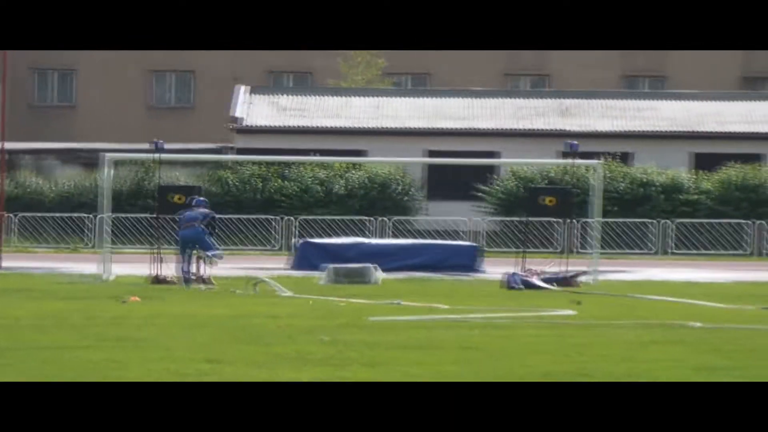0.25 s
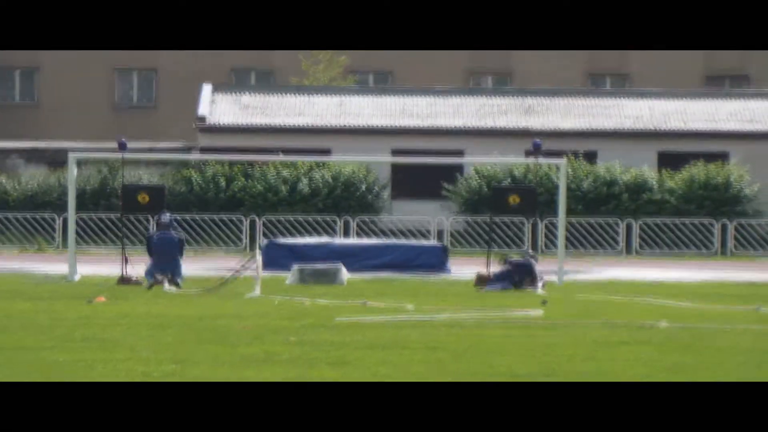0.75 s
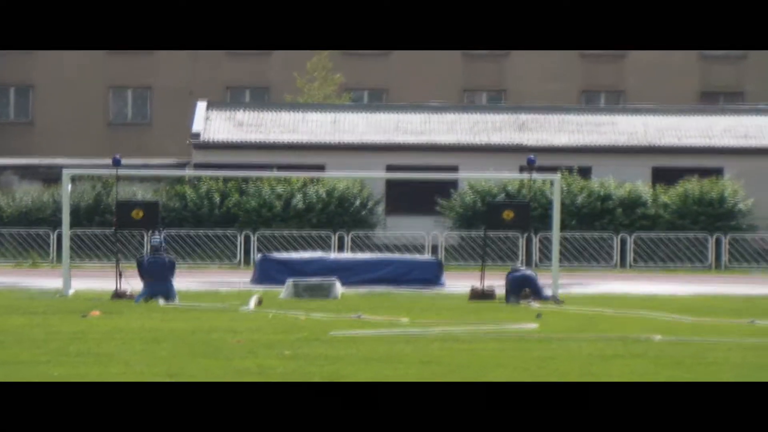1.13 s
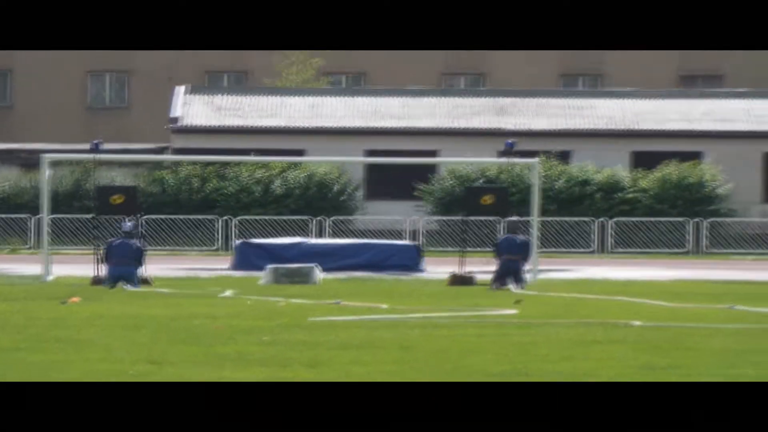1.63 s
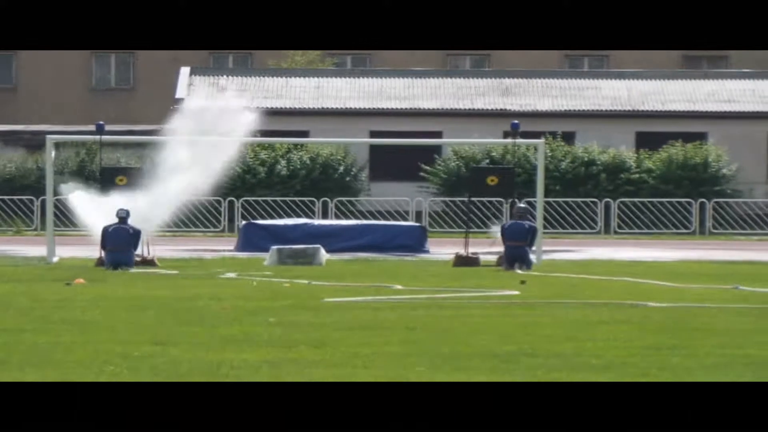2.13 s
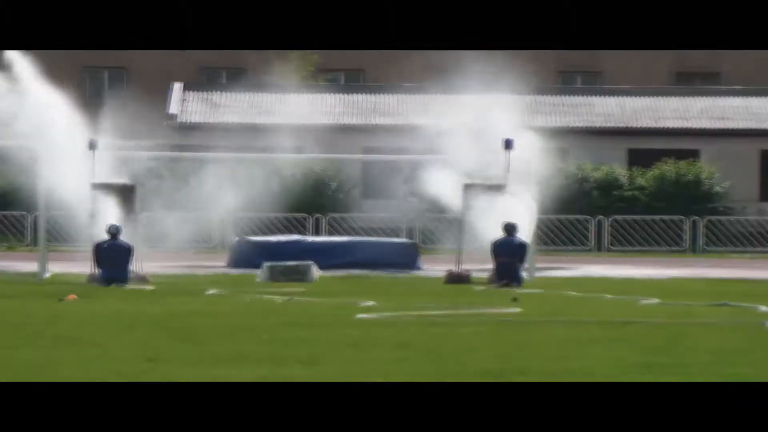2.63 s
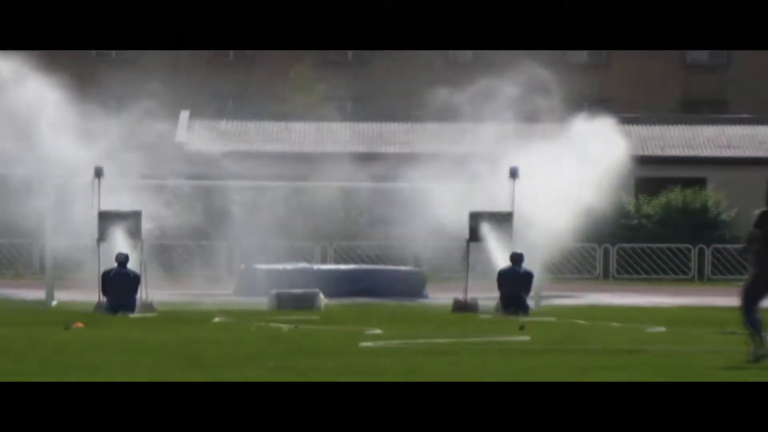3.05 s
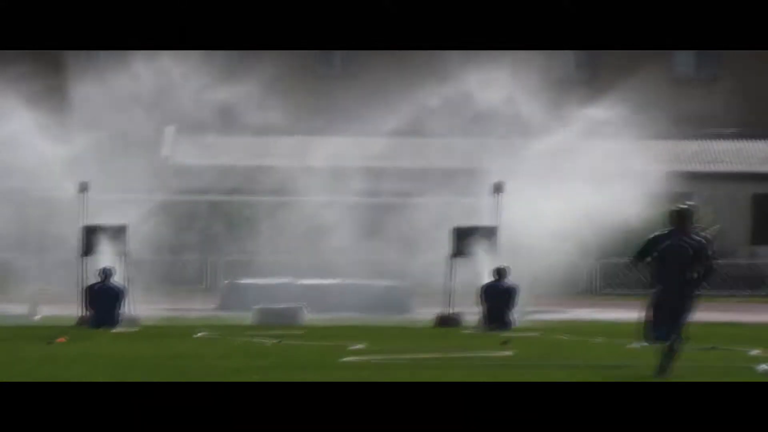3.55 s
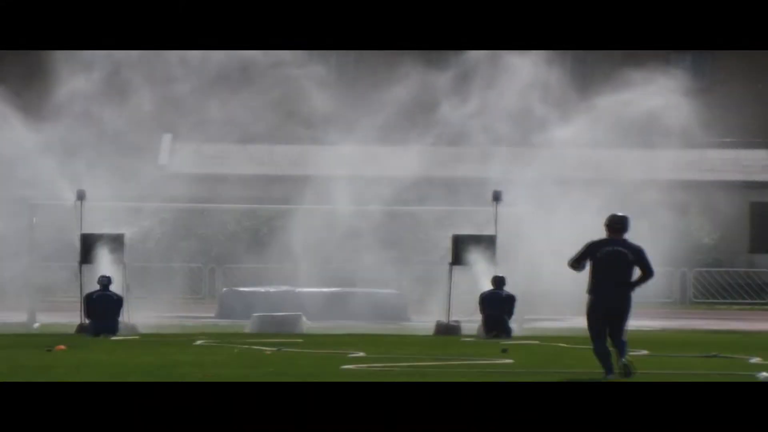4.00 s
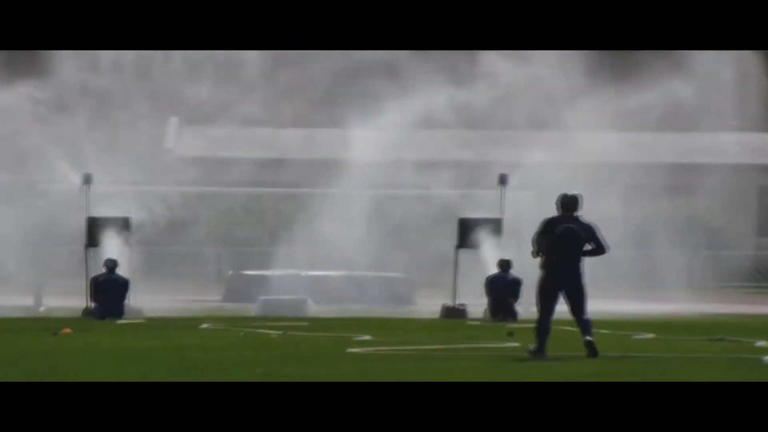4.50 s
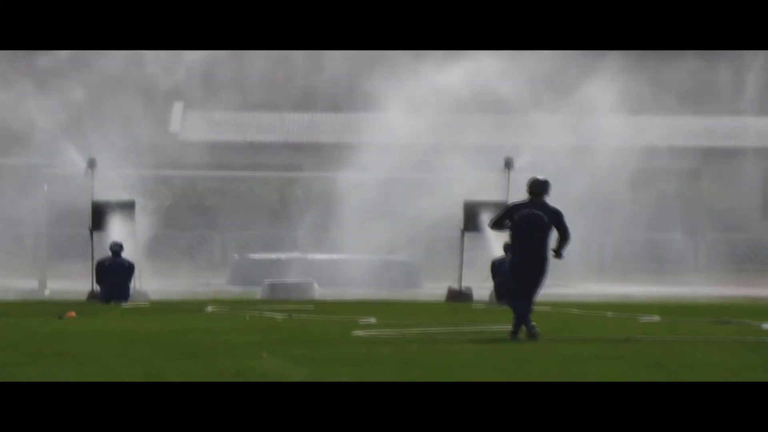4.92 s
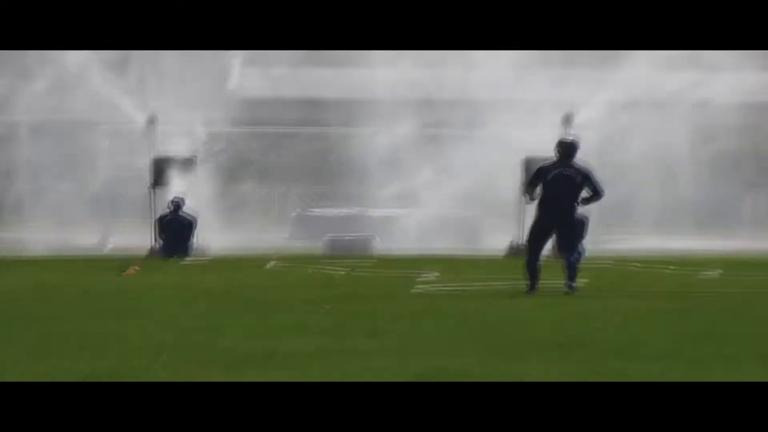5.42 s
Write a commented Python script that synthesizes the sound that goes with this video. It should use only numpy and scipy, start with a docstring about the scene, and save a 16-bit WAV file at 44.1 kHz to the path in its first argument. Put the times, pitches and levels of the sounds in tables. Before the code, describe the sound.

Loud engine drone throughout: first uneven, growling and clattery with a faint metallic ring and a short squeal, then a quick rev climb with a small surge and a sustained, tighter, piercing buzz. Broad water hiss swells with the climb, with brief spray splatters near the end. Open-air stereo pickup, engine slightly right, low rumble underneath, slight wall reflections.

```python
"""A short raspy squeal sounds first, over a four-cylinder petrol fire pump on an open exhaust by a sports field.
As the hoses fill and the nozzles open, the revs climb, the cylinders fire more evenly and water rushes;
late in the climb the engine surges, then narrow bands of its buzz swell and fade and the spray splatters in bursts.
Engine: cosine orders, firing impulses rung through spectra and a pipe, gated noise; water: shaped stereo noise.
The engine stands to the listener's right; buildings round the field answer faintly over a low rumble."""
import sys
import numpy as np
from scipy import signal
from scipy.fft import rfft, irfft, next_fast_len
from scipy.io import wavfile
from scipy.ndimage import uniform_filter1d, minimum_filter1d, map_coordinates

SR = 44100
rng = np.random.default_rng(int(sys.argv[2]) if len(sys.argv) > 2 else 0)


def output_pcm(signal):
    """Save a mono or channel-first signal as 16-bit PCM at the path in sys.argv[1].

    Samples are clipped to [-1, 1] before scaling.
    """
    pcm = np.clip(np.atleast_2d(signal).T, -1, 1) * 32767
    wavfile.write(sys.argv[1], SR, np.round(pcm).astype(np.int16))


N = 249606


def amp(db):
    """Logarithmic level: decibels to an amplitude ratio."""
    return 10 ** (np.asarray(db) / 20)


def levelled(x):
    """Power normalisation: hold the rms over a sliding fifth of a second at 1."""
    power = np.abs(uniform_filter1d(x ** 2, size=SR // 5))
    return x / np.sqrt(power + 1e-20)


def along(points, hz):
    """Logarithmic frequency scale: interpolate (frequency, value) points on it."""
    point_hz, values = np.transpose(points)
    return np.interp(np.log(hz + 1), np.log(point_hz + 1), values)


def curve(rows):
    """Linear interpolation: (time, value) rows become one value per sample."""
    times, values = np.transpose(rows)
    return np.interp(np.arange(N) / SR, times, values)


def wobble(rate):
    """Band-limited random drift: a smooth curve through `rate` random knots a second."""
    knots = rng.standard_normal(int(N * rate / SR) + 4)
    return map_coordinates(knots, [np.arange(N) * rate / SR])


def filtered(x, response):
    """Linear filtering: multiply the spectrum by a complex response of frequency."""
    size = next_fast_len(N + SR // 2)
    hz = np.fft.rfftfreq(size, 1 / SR)
    return irfft(rfft(x, size) * response(hz), size)[..., :N]


def coloured(x, spectrum):
    """Spectral shaping: filter noise to a spectrum, at rms 1."""
    return levelled(filtered(x, lambda hz: amp(along(spectrum, hz))))


def rung(x, spectrum, size=2048):
    """Minimum phase: the ringing that gives pulses their spectrum follows each one."""
    magnitude = amp(along(spectrum, np.fft.rfftfreq(size, 1 / SR)))
    cepstrum = irfft(np.log(magnitude))
    # folding the cepstrum onto positive time makes the response causal
    cepstrum[1:size // 2] *= 2
    cepstrum[size // 2 + 1:] = 0
    impulse_response = irfft(np.exp(rfft(cepstrum)))
    return signal.fftconvolve(x, impulse_response)[:N]


def pulses(at, sizes):
    """Fractional delay: share each impulse between its two neighbouring samples."""
    at = np.clip(at, 0, N - 2)
    whole = at.astype(int)
    part = at - whole
    return np.bincount(whole, sizes * (1 - part), N) + np.bincount(whole + 1, sizes * part, N)


def throb(train, decay, between):
    """Exponential relaxation: jump with each firing, then die away over `decay` seconds to `between`."""
    return between + signal.lfilter([1], [1, -np.exp(-1 / (decay * SR))], train)


def returned(hz, round_trip=0.001651):
    """Open-end reflection: the wave comes back along the exhaust pipe delayed (s) and inverted."""
    return -np.exp(-2j * np.pi * hz * round_trip)


def pipe(hz, reflection=0.99):
    """Comb interference: each pulse is followed by its weaker return."""
    return 1 + reflection * returned(hz)


# fixed peaks and dips of the exhaust and its echoes: (frequency [Hz], level [dB])
EXHAUST_RESPONSE = [(126, -26.7), (140, -24.5), (153, -21.5), (250, -18.8), (260, -15.5), (292, -11),
                    (306, -13.2), (376, -23.5), (382, -20.7), (440, -18), (449, -29), (461, -20.3),
                    (502, -24.5), (513, -30), (530, -22), (555, -19), (600, -30), (614, -39), (626, -41),
                    (630, -31.5), (722, -24), (746, -38), (753, -28), (766, -23)]
WANDER_DB, WANDER_KNOTS_PER_S = 0.39, 2.16  # slow drift of the lines: dB times the order number


def drone(firing_hz, firings, waver_db=0.37, count=5):
    """Source-filter principle: the lowest firing orders glide through the exhaust's fixed response."""
    out = np.zeros(N)
    for order in range(1, count + 1):
        db = along(EXHAUST_RESPONSE, order * firing_hz)
        db += order * WANDER_DB * wobble(WANDER_KNOTS_PER_S)
        db += waver_db * wobble(24.9)
        phase = 2 * np.pi * order * firings + np.angle(pipe(order * firing_hz))  # in step with the pulses
        out += amp(db) * np.sqrt(2) * np.cos(phase)
    return out


# unequal cylinders in firing order: (pulse at low revs [dB], pulse at high revs [dB])
CYLINDER_PULSES = [(-20, -3.2), (1.5, 1), (-14, -1.5), (-.5, 0)]


def combustion(firings, revs, scatter_db=.55, jitter=.000008):
    """Periodic excitation: one impulse per firing, from cylinders that grow more even with the revs."""
    number = np.arange(1, int(firings[-1]))
    at = np.interp(number, firings, np.arange(N))
    chance = rng.standard_normal((len(number), 2))
    low_db, high_db = np.array(CYLINDER_PULSES)[number % len(CYLINDER_PULSES)].T
    evenness = revs[at.astype(int)] ** .8
    sizes = amp(low_db + evenness * (high_db - low_db) + scatter_db * chance[:, 0])
    return pulses(at + jitter * SR * chance[:, 1], sizes)  # jitter in seconds


# spectra of the blow-down pulse at low, middle and high revs: (frequency [Hz], level [dB])
LOW_REVS_PULSE = [(750, 6.5), (880, 3), (1005, 7.5), (1130, 13), (1270, 10), (1380, 6), (1450, 12),
                  (1530, 11.5), (1630, 7), (1760, 14), (1890, 12), (2050, -9), (3000, -36.5)]
MIDDLE_REVS_PULSE = [(850, -1), (1030, 0), (1170, 4), (1310, 3), (1400, -1), (1620, -2), (1770, 9),
                     (1910, 3), (2050, -7), (2190, -6), (2400, -22), (3000, -35)]
HIGH_REVS_PULSE = [(910, 2.5), (1070, 3.2), (1220, 12), (1380, 1.5), (1530, 3), (1690, 6.5), (1840, 9),
                   (2050, -13), (3000, -35)]
EDGE_HZ, EDGE_WIDTH_HZ = 1076, 78  # weak cylinders lack the part of the pulse above this


def bark(edge, body, revs):
    """Blow-down radiation: pulses with an even body and uneven edge, whose colour moves with the revs."""
    def above(hz, corner_hz, width_hz):
        return (1 + np.tanh((hz - corner_hz) / width_hz)) / 2

    train = body + filtered(edge - body, lambda hz: above(hz, EDGE_HZ, EDGE_WIDTH_HZ))

    def voiced(spectrum, corner_hz):
        def response(hz):
            rounded = 1 / (1 + (hz / 3500) ** 6)
            return pipe(hz) * rounded * above(hz, corner_hz, 30)  # leaves the low orders to the drone
        return filtered(rung(train, spectrum), response)

    low = voiced(LOW_REVS_PULSE, 700)
    middle = voiced(MIDDLE_REVS_PULSE, 780)
    high = voiced(HIGH_REVS_PULSE, 830)
    climbing = np.interp(revs, [.12, .45], [0, 1])
    topped = np.interp(revs, [.75, .95], [0, 1])
    return levelled((1 - climbing) * low + (climbing - topped) * middle + topped * high)


# spectrum of the steepened returning wave: (frequency [Hz], level [dB])
CRACK_SPECTRUM = [(1200, -42), (2000, -25.5), (2140, -1), (2280, 5.5), (2440, 6), (2590, 7), (2760, 1),
                  (2920, 4), (3080, -1), (3360, 0), (3520, 1), (3700, -3), (3850, -5), (4400, -5.5),
                  (4700, -5), (4900, -1), (5150, -13), (6500, -30)]


def crack(train, reflection=.28):
    """Wave steepening: the returning wave is a bright crack, which runs the pipe once more."""
    def response(hz):
        band = (hz > 900) / (1 + (hz / 6000) ** 8)
        return band * returned(hz) * pipe(hz, reflection)
    return levelled(filtered(rung(train, CRACK_SPECTRUM), response))


# swelling or dipping bands of the buzz: (centre time [s], half length [s], frequency [Hz], gain [dB])
BAND_SWELLS = [(3.55, .17, 4840, 13), (4.146, 0.12, 2750, -4), (4.803, 0.36, 5000, 11.5),
               (5.3, 0.34, 3620, 7.5)]


def shifting(x, t, width_hz=110):
    """Time-varying equalisation: narrow bands of the buzz swell and fade."""
    out = x.copy()
    for centre_s, half_s, centre_hz, db in BAND_SWELLS:
        band = filtered(x, lambda hz: np.exp(-((hz - centre_hz) / width_hz) ** 2))
        gain = amp(db * np.exp(-((t - centre_s) / half_s) ** 4))
        out += (gain - 1) * band
    return out


# wavering lines at low revs: (multiple of the firing rate [ratio], level [dB])
GROWL_LINES = [(1.25, -45), (1.5, -43), (1.75, -42), (2.75, -46), (3.25, -44), (3.5, -47), (4.25, -43),
               (4.5, -42), (5.5, -45)]


def growl(firings, wander_db=2.0):
    """Subharmonic modulation: unequal cylinders put wavering lines between the drone's orders."""
    out = np.zeros(N)
    for multiple, db in GROWL_LINES:
        out += amp(db + wander_db * wobble(3.13)) * np.cos(2 * np.pi * multiple * firings)
    return np.sqrt(2) * out


# spectrum of the torn gas: (frequency [Hz], density [dB per Hz])
RASP_SPECTRUM = [(100, -18), (300, 3), (750, 5.5), (1600, 6), (2100, 4.5), (2400, 1), (2560, -8),
                 (2900, 3.5), (4300, 0.5), (5200, -0.5), (6500, -29), (14500, -6), (15800, -55)]


def rasp(train, decay=.004, between=.4):
    """Jet turbulence: gas tears at the pipe mouth with each pulse."""
    return coloured(rng.standard_normal(N) * throb(train, decay, between), RASP_SPECTRUM)


def rattle(firings, size=1400):
    """Cyclic noise: valve gear and pump repeat a slowly drifting rattle every four firings."""
    place = firings / len(CYLINDER_PULSES) % 1 * size
    patterns = rng.standard_normal((2, size))
    first, second = [map_coordinates(row, [place], mode="grid-wrap") for row in patterns]
    drift = 0.77 * wobble(1.232)  # radians of blend between the two patterns
    return np.cos(drift) * first + np.sin(drift) * second


# spectrum of the rattle: (frequency [Hz], density [dB per Hz])
CLATTER_SPECTRUM = [(60, -16), (120, -5), (190, -13), (450, 1), (620, -12.5), (850, -11), (1450, -3.5),
                    (2000, -4.5), (2400, -5), (2700, -8), (4000, -16.5), (8000, -62)]


def clatter(train, firings):
    """Amplitude modulation: the rattle is strongest just after each firing."""
    return coloured(rattle(firings) * throb(train, decay=0.0013, between=0.35), CLATTER_SPECTRUM)


RING_HZ, RING_WIDTH_HZ = 2510, 200


def casing(firings, noisy=.7):
    """Forced resonance: rattle and random knocking ring the casing at one pitch, whatever the revs."""
    def resonance(hz):
        damping = 1j * hz * RING_WIDTH_HZ
        return damping / (RING_HZ ** 2 - hz ** 2 + damping)
    knocking = rattle(firings) + noisy * rng.standard_normal(N)
    return levelled(filtered(knocking, lambda hz: resonance(hz) ** 2))


# steady metallic ring: (time [s], level [dB])
CASING_LEVEL = [(.3, -35), (2.2, -31.5), (3.15, -31.5), (3.6, -43)]
# each layer: level at low revs (dB), change at full revs (dB)
BARK_DB, BARK_GAIN_DB = -24, 5.2
CRACK_DB, CRACK_GAIN_DB = -34, 10.5
RASP_DB, RASP_GAIN_DB = -30.5, 2
CLATTER_DB, CLATTER_GAIN_DB = -29, -2
GROWL_GAIN_DB = 2.5
OPENING_DB, OPENING_S = 0.5, 0.59  # the bark starts a little harder and eases
SURGE_S, SURGE_WIDTH_S, SURGE_DB = 3.5, 0.15, 1.5  # bark and crack surge late in the climb


def engine(firings, revs, t):
    """Superposition: the exhaust grows with the revs and surges near the top; clatter and ring recede."""
    train = combustion(firings, revs)
    even_train = combustion(firings, np.ones(N))
    opening_db = OPENING_DB * np.clip(1 - t / OPENING_S, 0, 1)
    out = amp(BARK_DB + BARK_GAIN_DB * revs + opening_db) * bark(train, even_train, revs)
    out += amp(CRACK_DB + CRACK_GAIN_DB * revs) * shifting(crack(train), t)
    out *= amp(SURGE_DB * np.exp(-((t - SURGE_S) / SURGE_WIDTH_S) ** 2))
    out += amp(GROWL_GAIN_DB * revs) * growl(firings)
    out += amp(RASP_DB + RASP_GAIN_DB * revs) * rasp(train)
    out += amp(CLATTER_DB + CLATTER_GAIN_DB * revs) * clatter(train, firings)
    return out + amp(curve(CASING_LEVEL)) * casing(firings)


# brief squeal at the start: (time [s], level [dB])
SQUEAL_LEVEL = [(0, -41), (.1, -32.5), (.38, -33), (.41, -30), (.49, -35), (.6, -50), (.68, -90)]
SQUEAL_HZ, SQUEAL_GLIDE_HZ_PER_S, SQUEAL_WIDTH_HZ = 3385, 130, 135


def squeal(t):
    """Narrow-band noise: slow noise modulates a rising carrier into a raspy squeal that peaks and stops."""
    slow_noise = lambda hz: 1 / (1 + (hz / SQUEAL_WIDTH_HZ) ** 2)
    flutter = filtered(rng.standard_normal((2, N)), slow_noise)
    phase = 2 * np.pi * np.cumsum(SQUEAL_HZ + SQUEAL_GLIDE_HZ_PER_S * t) / SR
    tone = flutter[0] * np.cos(phase) + flutter[1] * np.sin(phase)
    return amp(curve(SQUEAL_LEVEL)) * levelled(tone)


# likeness of the left and right noise: (frequency [Hz], correlation [ratio])
EAR_LIKENESS = [(300, 1), (800, 0.18), (2500, 0.98), (5500, 0.21), (8000, 1), (10000, 1), (12000, 1)]


def air(spectrum):
    """Interaural coherence: wide noise that is partly alike in both ears."""
    def widths(hz):
        alike = np.clip(along(EAR_LIKENESS, hz), -1, 1)
        return np.sqrt([1 + alike, 1 - alike])
    mid, side = filtered(rng.standard_normal((2, N)), widths)
    return coloured(np.array([mid + side, mid - side]), spectrum)


# spectrum of the rushing water: (frequency [Hz], density [dB per Hz])
RUSH_SPECTRUM = [(30, -46), (120, -12), (300, 1), (700, -7), (1700, -6), (2900, -7), (4200, -6),
                 (5300, -7.5), (6700, -5), (12000, -12.5), (14800, -11.5), (15800, -25)]
SPRAY_START_S, SPRAY_RISE_S = 2.84, 0.53  # the jets build up
RUSH_DB, SPRAY_GAIN_DB = -31.8, 5.3  # the rush before the jets, and what they add


def water(t, flutter_db=.5):
    """Turbulent flow noise: the rush swells as the jets build up, then holds."""
    flow = np.clip((t - SPRAY_START_S) / SPRAY_RISE_S, 0, 1)
    return amp(RUSH_DB + SPRAY_GAIN_DB * flow + flutter_db * wobble(27)) * air(RUSH_SPECTRUM)


# bursts of spray: (centre time [s], half length [s], level [dB])
SPRAY_BURSTS = [(4.526, 0.038, -28), (4.82, 0.061, -26), (5.257, 0.2, -26)]
# spectrum of the spray: (frequency [Hz], density [dB per Hz])
SPRAY_SPECTRUM = [(1200, -30), (2400, -5), (3300, -5), (5000, -7), (7500, -19)]


def splashes(t):
    """Droplet impact noise: the jets splatter in brief bursts."""
    envelope = sum(amp(db) * np.exp(-((t - centre_s) / half_s) ** 2) for centre_s, half_s, db in SPRAY_BURSTS)
    return envelope * air(SPRAY_SPECTRUM)


# spectrum of the outdoor rumble: (frequency [Hz], density [dB per Hz])
RUMBLE_SPECTRUM = [(10, 3), (25, -1), (60, 5), (120, 9), (300, 11), (1000, -31)]


def rumble():
    """Ambient noise: a steady low outdoor rumble."""
    return amp(-42.5) * air(RUMBLE_SPECTRUM)


# distinct reflections: (delay [s], level [dB])
WALL_ECHOES = [(.0057, -13.5), (.0208, -19)]


def wall(x):
    """Comb filtering: gliding harmonics fade and swell as they cross the combs of two reflections."""
    def reflections(hz):
        return sum(amp(db) * np.exp(-2j * np.pi * hz * delay) for delay, db in WALL_ECHOES)
    return x + filtered(x, reflections)


# decay of the field's answer: (frequency [Hz], time to fall 60 dB [s])
FIELD_DECAY = [(200, 0.39), (2000, 1), (10000, 0.0093)]


def surroundings(x):
    """Diffuse reverberation: ground, fences and walls answer with exponentially decaying noise."""
    noise = rng.standard_normal((2, SR // 3))
    hz, times, bins = signal.stft(noise, SR, nperseg=256)
    decay = amp(-60 * times / along(FIELD_DECAY, hz)[:, None])
    tail = signal.istft(bins * decay, SR, nperseg=256)[1]
    return signal.fftconvolve(x[None], tail / np.linalg.norm(tail[0]), axes=1)[:, :N]


def listening_position(x, lag=.000057, balance_db=.3):
    """Arrival-time difference: sound reaches the left a little later (lag in s), slightly louder."""
    side = np.array([[1], [-1]])  # left, right
    return amp(balance_db * side) * filtered(x, lambda hz: np.exp(-1j * np.pi * hz * lag * side))


# the shaft's speed: (time [s], firing rate [Hz])
SHAFT_SPEED = [(0.35, 125.75), (0.7, 125.3), (1.3, 125.4), (2.45, 127), (2.65, 128.3), (2.82, 130.3),
               (3.05, 134.4), (3.55, 145.8), (3.78, 149.5), (4.0, 151.1), (4.25, 152.1), (4.9, 152.9),
               (5.6, 154)]


def scene():
    """Common drive: the shaft paces every engine layer, before rushing water and a low outdoor rumble."""
    t = np.arange(N) / SR
    firing_hz = curve(SHAFT_SPEED)
    firings = np.cumsum(firing_hz) / SR  # running count
    revs = (firing_hz - firing_hz.min()) / np.ptp(firing_hz)  # 0 at the slowest, 1 at the fastest
    sharp = engine(firings, revs, t)
    background = water(t) + splashes(t) + squeal(t) + rumble()
    direct = drone(firing_hz, firings) + wall(sharp) + background
    return listening_position(direct) + amp(-17) * surroundings(sharp)


TOP_HZ = 15800


def record(dry, ceiling=.98):
    """Peak limiting and band limiting: turn down the tallest peaks, then remove all from TOP_HZ up."""
    needed = ceiling / np.maximum(np.abs(dry).max(axis=0), ceiling)
    gain = uniform_filter1d(minimum_filter1d(needed, size=121), size=121)
    return filtered(dry * gain, lambda hz: hz < TOP_HZ)


dry = scene()
out = record(dry)
output_pcm(out)
```